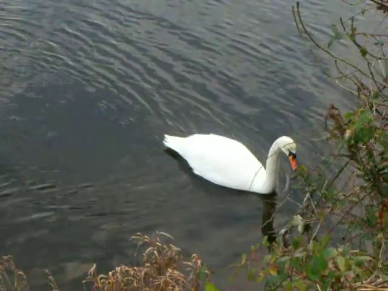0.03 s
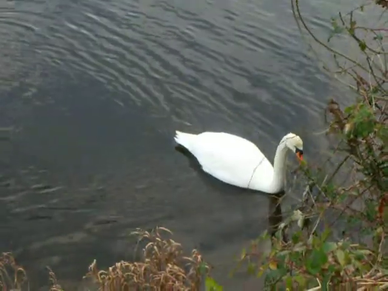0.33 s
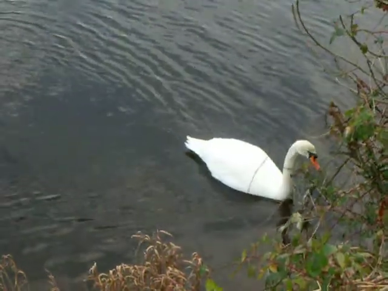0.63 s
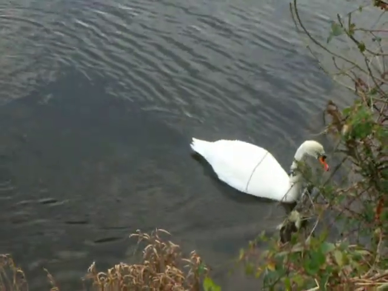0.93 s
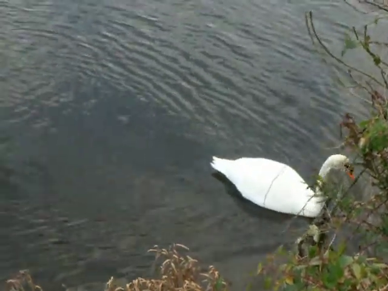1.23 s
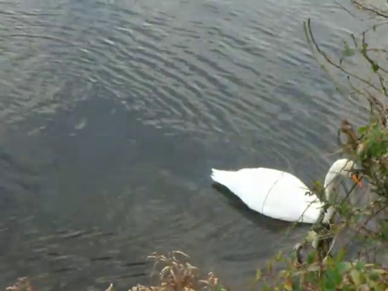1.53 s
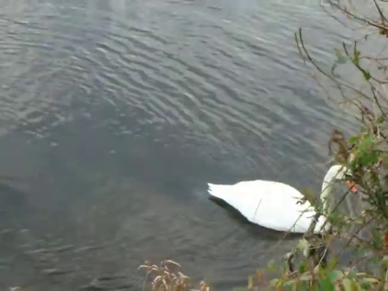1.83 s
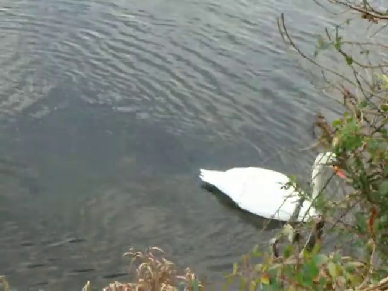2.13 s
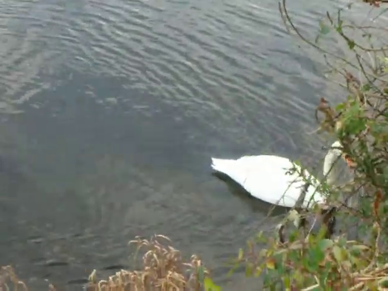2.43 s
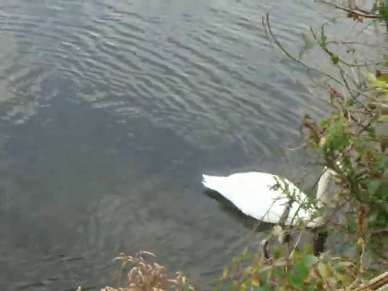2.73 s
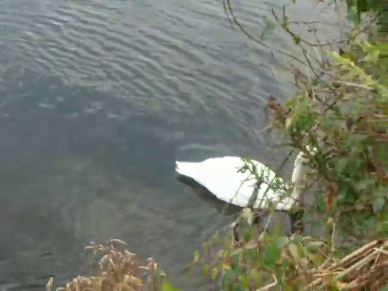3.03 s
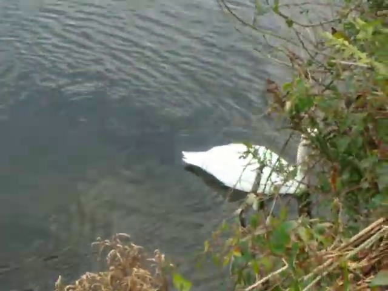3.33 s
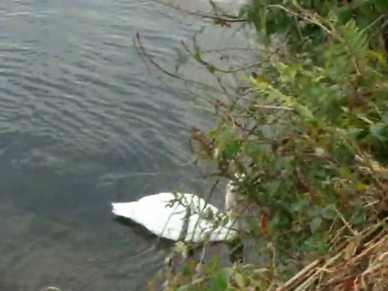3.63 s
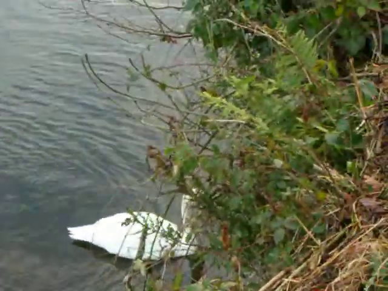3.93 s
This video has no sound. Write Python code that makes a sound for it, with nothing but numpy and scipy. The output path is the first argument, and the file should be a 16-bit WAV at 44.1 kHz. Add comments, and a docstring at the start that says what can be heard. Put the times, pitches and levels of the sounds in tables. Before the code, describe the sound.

A river hisses softly and evenly past a small hand-held camera on the bank. The camera case clicks once early, then several more times with faint finger rubs, two clicks sharp and loud, before only the water remains.

```python
"""From the start a river hisses evenly past a small hand-held camera on the bank, tiny bubbles ringing
in its wash, over the faint hum and thin whine of the narrow-band mono recorder. At 0.8 s fingers shift
on the camera and its case clicks. From about 2 s they rub softly between more clicks, and two of these,
near 2.8 and 3.1 s, hit hard enough to overload. A last click and rub give way to the river."""
import sys
import numpy as np
from scipy import signal
from scipy.fft import rfft, irfft
from scipy.io import wavfile
from scipy.ndimage import uniform_filter1d

SR = 44100
rng = np.random.default_rng(int(sys.argv[2]) if len(sys.argv) > 2 else 0)


def materialize(psi):
    """Save the field psi as 16-bit PCM at rate SR to the path in sys.argv[1].

    A 1-D psi becomes a single channel; in a 2-D psi each row is a channel.
    """
    bounded = np.clip(np.atleast_2d(psi).T, -1, 1)
    quanta = np.round(bounded * 32767).astype(np.int16)
    wavfile.write(sys.argv[1], SR, quanta)


N = 176400

# The recorder's hum and whine. Each row: pitch in Hz, rms level in dB.
HUM_TONES = [(344.5, -62), (689.1, -60.5), (861.3, -62.5), (5012, -57), (6013, -61.5)]
# Tone colour of the moving water. Each row: frequency in Hz, relative spectral level in dB.
WASH_EQ = [(12, -31), (20, -4), (22, -11.5), (54, 2.5), (113, -7.5), (139, -6.5), (278, -7), (313, -7),
           (343, -6), (412, -5.5), (670, -1.5), (806, -5), (884, -4), (2180, -7.5), (5000, -9),
           (6500, -23.5), (11000, -120)]
# Fingers rubbing the case. Each row: middle in seconds, half length in seconds, level in dB,
# band centre in Hz, band width in octaves.
FINGER_RUBS = [(1.951, 0.019, -38, 2240, 0.38), (2.436, 0.024, -44, 1380, 0.24),
               (3.1, 0.089, -42, 2130, 0.93), (3.294, 0.068, -40.5, 2280, .45),
               (3.3, 0.068, -42.5, 4540, 0.14)]
# Clicks of the case. Each row: start in seconds, knock level in dB, knock pitch in Hz, knock rise in
# seconds, snap level in dB, snap pitch in Hz, tick level in dB, ring level in dB, ring tilt in dB per
# octave, rattle level in dB.
CASE_CLICKS = [(0.8086, -25.5, 330, 0.0015, -19, 2600, -26.5, -25.5, -7, -26.5),
               (2.2984, -21, 1400, 0.00059, -45.5, 2520, -45, -47, -1, -43),
               (2.7566, -2.5, 1993, 0.0006, -6, 3020, -20, -14, 1, -24),
               (2.7714, -22, 282, 0.0015, -24, 2100, -45, -49, 0, -48),
               (2.9856, -33, 1900, 0.00085, -26.5, 2900, -40, -44, -5, -34),
               (3.0716, -7.5, 1788, .0015, -2, 2700, -5.5, -2.5, 1, -27),
               (3.2065, -26, 450, .003, -15, 2170, -19, -22, -6.5, -24)]
# Resonances of the case. Each row: pitch in Hz, relative level in dB, time to fall 60 dB in seconds.
CASE_MODES = [(455, -10, .04), (730, -12.5, 0.017), (875, -10.5, 0.033), (1137, -1, 0.023),
              (1640, -0.5, .012), (1869, 1.5, .017), (2220, -7.5, 0.028), (2730, -16, 0.012),
              (5024, -12, 0.011)]
# Tone colour of the rattle after a click. Each row: frequency in Hz, relative spectral level in dB.
RATTLE_EQ = [(100, -10), (400, -9), (750, 12), (1400, 8), (2400, 5.5), (3600, 1.5), (5000, 2), (7000, -47)]
# Treble roll-off of the microphone channel. Each row: frequency in Hz, gain in dB.
MIC_EQ = [(4900, 0), (5150, 2), (5500, -3.5), (5900, -7.5), (6150, -29.5), (6400, -68), (7000, -109)]


def amp(db):
    """Decibels to gain."""
    return 10 ** (np.asarray(db) / 20)


def unit(x):
    """Scales to rms 1."""
    return x / np.sqrt(np.mean(x ** 2) + 1e-20)


def equalise(x, curve):
    """Shapes a sound with an EQ curve drawn on a log-frequency axis."""
    curve_hz, curve_db = np.transpose(curve)
    hz = np.fft.rfftfreq(len(x), 1 / SR)
    gain_db = np.interp(np.log(hz + 1), np.log(curve_hz + 1), curve_db)
    return irfft(rfft(x) * amp(gain_db), len(x))


def burst(t, db, hz, rise_s):
    """A short tone that swells to its level and dies at once."""
    return amp(db) * (t / rise_s) ** 2 * np.exp(2 * (1 - t / rise_s)) * np.sin(2 * np.pi * hz * t)


def hum():
    """The camera's electronics lay steady, faint tones under everything."""
    t = np.arange(N) / SR
    return sum(np.sqrt(2) * amp(db) * np.sin(2 * np.pi * (hz * t + rng.random())) for hz, db in HUM_TONES)


def river(level_db=-39.5, patch_db=0.5, swell_db=0.18):
    """Moving water makes a wide bed of noise with faint drifting patches of colour and a slow swell."""
    _, _, spectra = signal.stft(rng.standard_normal(N), SR, nperseg=1024, noverlap=768)
    across_bands = uniform_filter1d(rng.standard_normal(spectra.shape), size=14, axis=0)
    patches = unit(uniform_filter1d(across_bands, size=14, axis=1))
    swell = unit(uniform_filter1d(rng.standard_normal(spectra.shape[1]), size=70))
    drift = amp(patch_db * patches + swell_db * swell)
    wash = signal.istft(spectra * drift, nperseg=1024, noverlap=768)[1][:N]
    top_cut = [(6500, WASH_EQ[-1][1]), (7000, -90)]
    return amp(level_db) * unit(equalise(wash, WASH_EQ + top_cut))


def bubbles(level_db=-52.5, per_s=210, pitches=24, ring_cycles=10):
    """Tiny bubbles ring briefly at random moments inside the wash."""
    t, fizz = np.arange(2048) / SR, np.zeros(N)
    for hz in np.geomspace(500, 3500, num=pitches):
        onsets = rng.random(N) < per_s / pitches / SR
        strength = amp(-1.5 * np.minimum(rng.exponential(1, N), 4))  # up to 6 dB softer
        age = hz * t / ring_cycles
        ping = age * np.exp(-2 * age) * np.sin(2 * np.pi * hz * t)
        fizz += signal.oaconvolve(onsets * strength, ping)[:N]
    return amp(level_db) * unit(fizz)


def finger_rub(middle_s, half_s, db, centre_hz, octaves, grain_db=3):
    """A finger slips over the case: a band of grainy friction that swells and fades."""
    t, hz = np.arange(N) / SR, np.fft.rfftfreq(N, 1 / SR)
    noise = rng.standard_normal(N)
    grain = amp(grain_db * unit(uniform_filter1d(rng.standard_normal(N), size=150)))
    band = np.exp(-0.5 * (np.log2((hz + 1) / centre_hz) / octaves) ** 2)
    friction = irfft(rfft(noise * grain) * band, N)
    return amp(db) * unit(friction) * np.exp(-0.5 * ((t - middle_s) / half_s) ** 2)


def case_click(knock_db, knock_hz, knock_rise_s, snap_db, snap_hz, tick_db, ring_db, tilt_db, rattle_db):
    """A knock, a snap and a thin tick of plastic set the case ringing, with a brief rattle."""
    t = np.arange(4096) / SR
    knock = burst(t, knock_db, knock_hz, knock_rise_s)
    snap = burst(t, snap_db, snap_hz, rise_s=0.00048)
    tick = burst(t, tick_db, hz=4300, rise_s=0.00026)
    ring = np.zeros(len(t))
    for k, (hz, db, t60) in enumerate(CASE_MODES):
        gain = amp(ring_db + db + tilt_db * np.log2(hz / 2000))
        envelope = (1 - np.exp(-hz * t / 2.2)) * amp(-60 * t / t60)  # attack of 2.2 cycles
        ring += (-1) ** k * gain * envelope * np.sin(2 * np.pi * hz * t)
    rattle = amp(rattle_db) * unit(equalise(rng.standard_normal(len(t)), RATTLE_EQ))
    rattle_envelope = (1 - np.exp(-t / 0.00012)) * amp(-60 * t / 0.055)  # sharp attack, 55 ms tail
    return knock + snap + tick + ring + rattle * rattle_envelope


def scene():
    """River, hum and handling meet at one microphone, the same on both channels."""
    mix = river() + bubbles() + hum() + sum(finger_rub(*row) for row in FINGER_RUBS)
    for start_s, *settings in CASE_CLICKS:
        click = case_click(*settings)
        start = round(start_s * SR)
        mix[start:start + len(click)] += click
    return np.array([mix, mix])


def record(dry, ceiling=0.72, knee=24, edge_hz=16000):
    """The recorder dulls the treble, clips the loudest clicks with a firm knee, then limits the band."""
    dull = np.array([equalise(channel, MIC_EQ) for channel in dry])
    clipped = dull / (1 + abs(dull / ceiling) ** knee) ** (1 / knee)
    lowpass = signal.firwin(511, edge_hz, window=("kaiser", 9), fs=SR)
    return signal.oaconvolve(clipped, lowpass[None], "same")


dry = scene()
out = record(dry)
materialize(out)
```